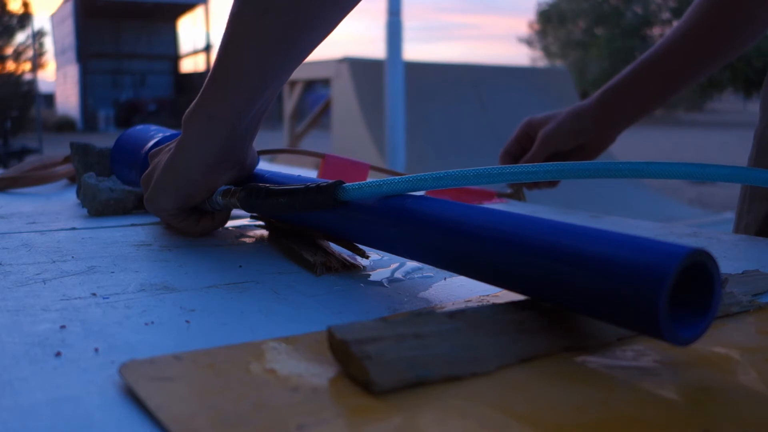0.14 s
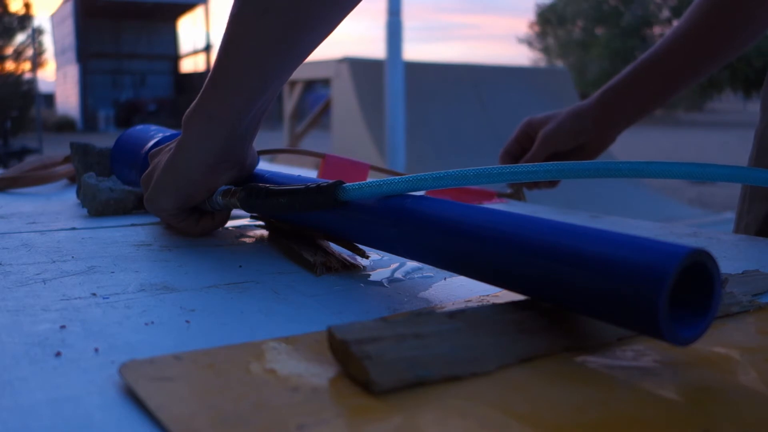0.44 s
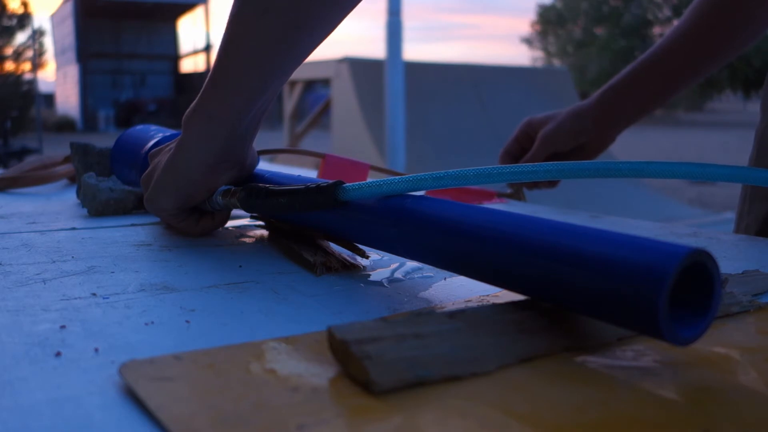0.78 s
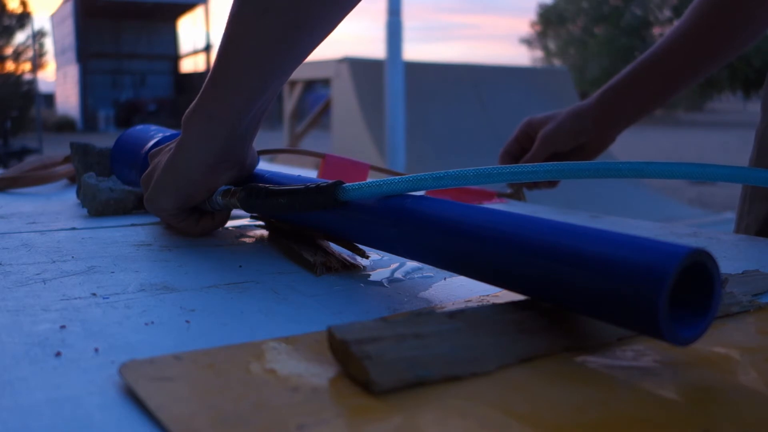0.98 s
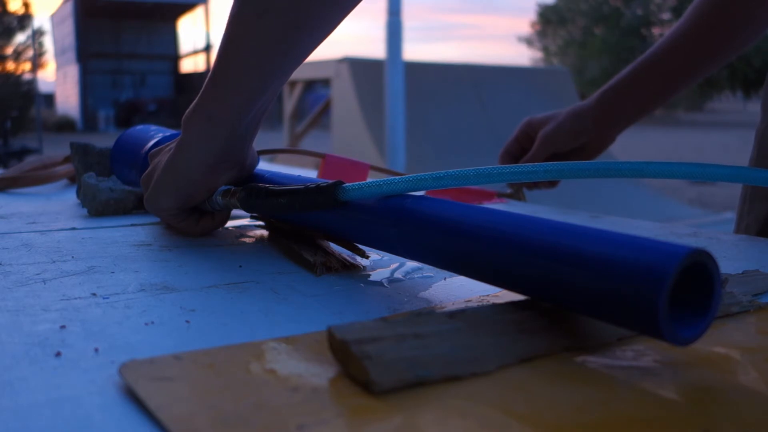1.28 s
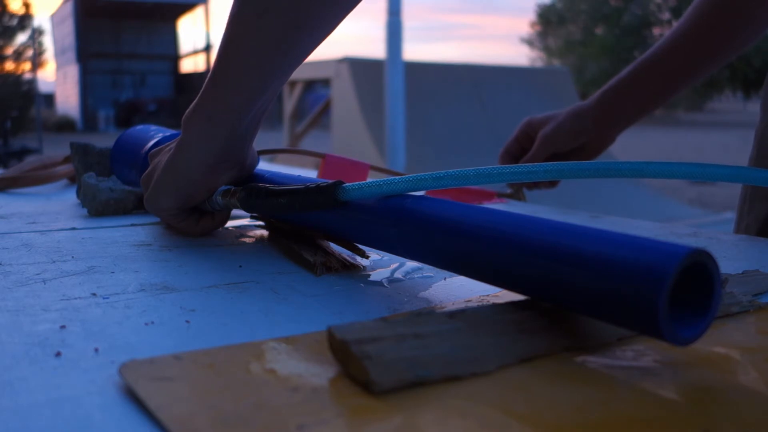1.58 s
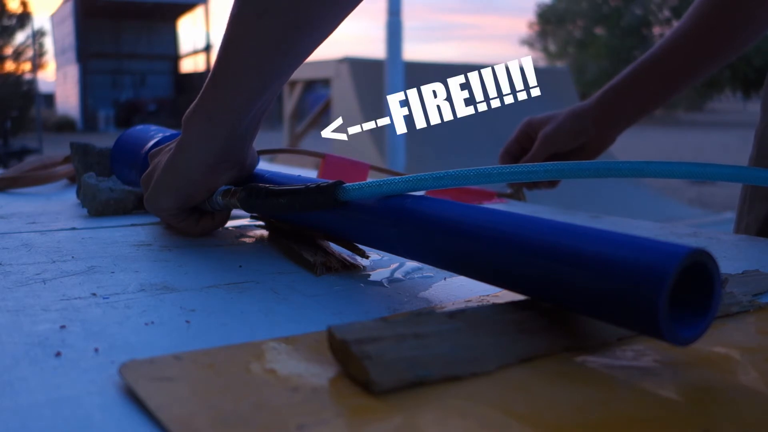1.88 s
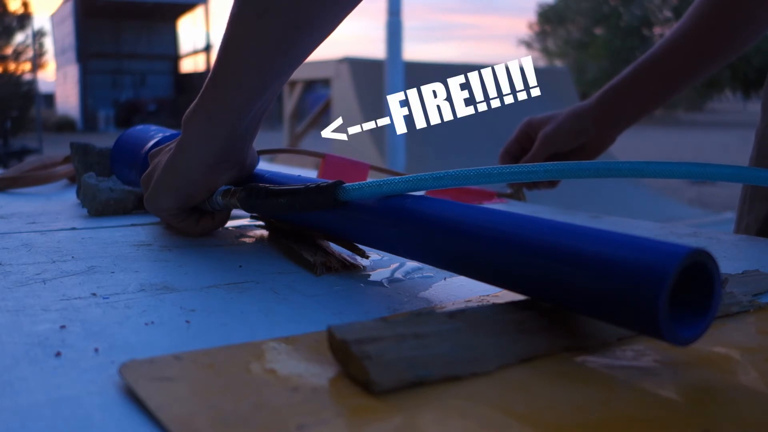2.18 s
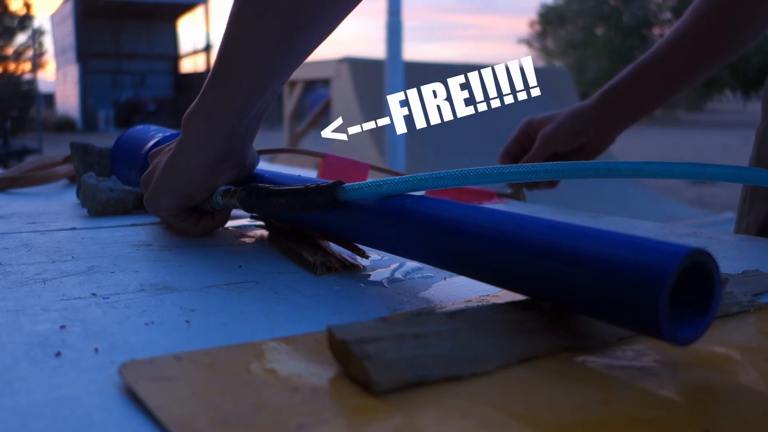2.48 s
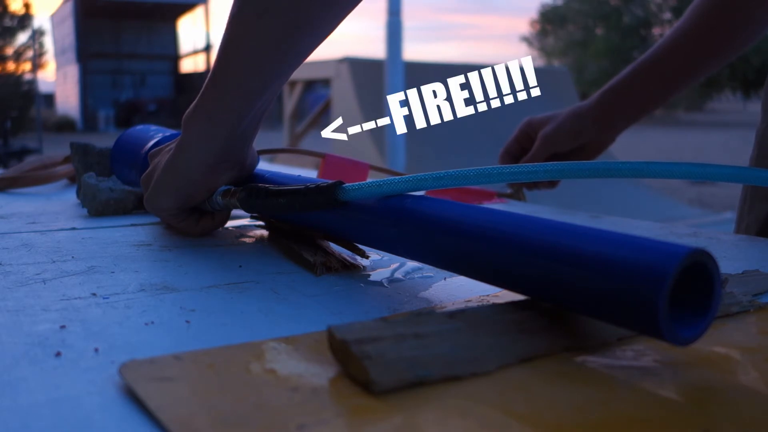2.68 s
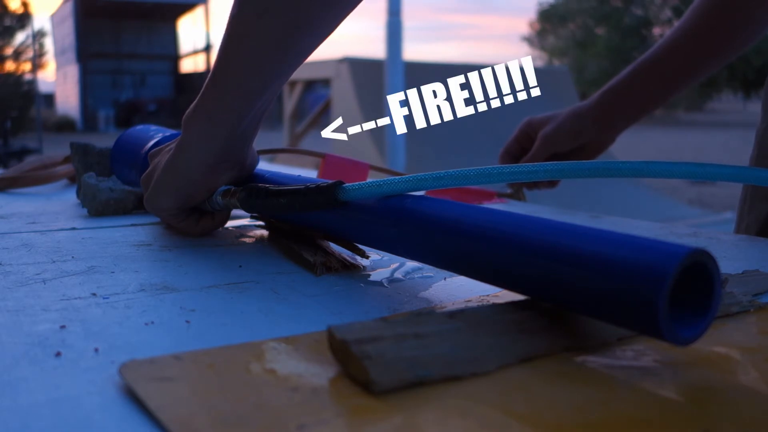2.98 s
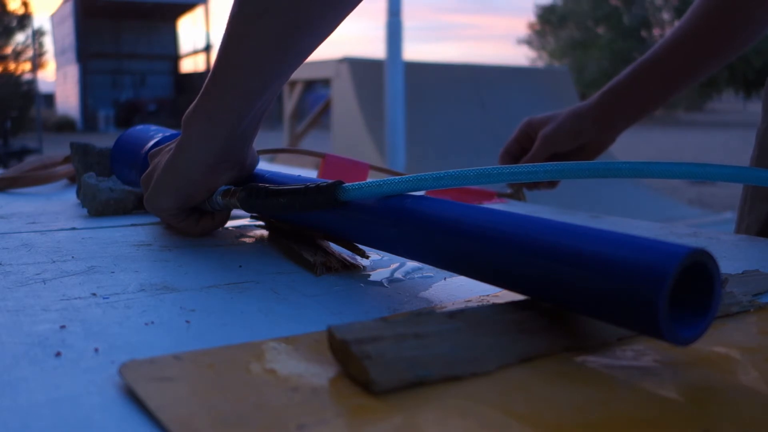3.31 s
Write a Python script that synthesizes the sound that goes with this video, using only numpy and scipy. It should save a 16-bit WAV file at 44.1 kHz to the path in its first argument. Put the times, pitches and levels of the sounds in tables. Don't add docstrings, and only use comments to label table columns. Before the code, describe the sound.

A small tube jet burning gas drones loudly from 0 to about 3.45 seconds without a break. Its rough, hollow notes flutter over a low roar, creeping slightly higher in pitch. Rushing air hisses with flickering high whistles. Faint dull ticks come near 0.5, 0.8-0.9, 1.9, 2.2 and 3.3-3.4 seconds. Close outdoor stereo camera sound, thin bass, compressed peaks, short bright wall reflections.

```python
import sys
import numpy as np
from scipy import signal
from scipy.fft import rfft, irfft, next_fast_len
from scipy.io import wavfile
from scipy.ndimage import uniform_filter1d, map_coordinates

SR = 44100
rng = np.random.default_rng(int(sys.argv[2]) if len(sys.argv) > 2 else 0)


def to_wav(sig):
    pcm = np.clip(np.atleast_2d(sig), -1, 1) * 32767
    pcm = np.round(pcm).astype(np.int16)
    wavfile.write(sys.argv[1], SR, pcm.T)


def elevation(decibels):
    levels = np.asarray(decibels, float)
    return 10 ** (levels / 20)


N = 152145
LEFT_RIGHT = np.array([[.5], [-.5]])


def unit(x):
    return x / np.sqrt(np.mean(np.abs(x) ** 2, -1, keepdims=True) + 1e-20)


def along(points, hz):
    point_hz, value = np.transpose(points)
    return np.interp(np.log(hz + 1), np.log(point_hz + 1), value)


def curves(rows):
    start_s, *columns = np.transpose(rows)
    return [np.interp(np.arange(N) / SR, start_s, column) for column in columns]


def wobble(rate):
    return map_coordinates(rng.standard_normal(1000), [np.arange(N) * rate / SR])


def filtered(x, response):
    size = next_fast_len(N + SR // 4)
    return irfft(rfft(x, size) * response(np.fft.rfftfreq(size, 1 / SR)), size)[..., :N]


def noise(spectrum):
    return unit(filtered(rng.standard_normal((2, N)), lambda hz: elevation(along(spectrum, hz))))


def note(pitch_hz, width_hz, steady):
    keep = np.exp(-np.pi * width_hz / SR)
    poles = np.convolve([1, -keep], [1, -keep ** 11.8])
    shaking = rng.standard_normal((2, N, 2)) @ [1, 1j]
    swing = unit(signal.lfilter([1], poles, shaking, axis=1))
    swing = swing * (np.abs(swing) + 0.069) ** -np.clip(steady, 0, 1)
    phase = 2 * np.pi * np.cumsum(pitch_hz * np.ones(N)) / SR
    return unit((swing * np.exp(1j * phase)).real)


# start_s [s], second_note_hz [Hz], level_db [dB], lowest_note_db [dB against the others]
FLAME_COURSE = [(0.0, 520.5, -14.5, -4.8), (0.2, 535.3, -19, 5), (0.41, 534.7, -16.5, -2.8),
                (0.61, 523.3, -18, 2.8), (0.81, 530.7, -15.5, -3), (1.01, 531.6, -16, -5),
                (1.22, 537.8, -15, -2), (1.42, 541, -18, 0.5), (1.62, 541, -16, -1),
                (1.83, 542.1, -17.5, -1.5), (2.03, 539.3, -18, 0.8), (2.23, 541, -16.6, -1),
                (2.44, 540.4, -16.5, 0), (2.64, 553.7, -17.5, 2), (2.84, 554.8, -15.5, -2),
                (3.04, 548.9, -15.6, -3.5), (3.25, 554.7, -16, -1), (3.45, 559.5, -16.5, -1.5)]
# pitch_hz [Hz], width_hz [Hz], level_db [dB], heat_follow [share of the heat's climb]
TUBE_NOTES = [
    (198.3, 24.1, -3, 0.13),
    (541, 31.5, 0, .95),
    (1011.4, 60, -11.5, 1.2),
    (1475, 98, -19, .8),
]
NOTE_STEADINESS = [.12, .23, 0, 0]
# start_s [s], level_db [dB]
THIRD_NOTE_SWELL = [(0, 0), (.1, -5.5), (.22, 6), (.35, -2.5), (.58, 5), (.87, -6.5), (1.05, -1), (1.75, 0),
                    (2.25, 2), (3, -1), (3.3, 1), (3.45, 4)]
# pitch_hz [Hz], level_db [dB]
ROAR_COLOUR = [(20, -26), (60, -16), (150, -4.5), (240, -3), (330, -16), (450, -4), (800, -15.5),
               (1300, -23), (2000, -40)]


def flame():
    second_hz, level_db, lowest_db = curves(FLAME_COURSE)
    heat = second_hz / second_hz.mean()
    notes = []
    for (hz, width_hz, db, follow), steady in zip(TUBE_NOTES, NOTE_STEADINESS):
        flutter = 1 + .012 * wobble(13)
        level = elevation(db + 0.3 * wobble(6.17))
        notes.append(level * note(hz * heat ** follow * flutter, width_hz, steady))
    notes[0] = notes[0] * elevation(lowest_db - lowest_db.mean())
    notes[2] = notes[2] * elevation(curves(THIRD_NOTE_SWELL)[0] + 1.3 * wobble(13))
    roar = elevation(-15.5 + 1.1 * wobble(60)) * noise(ROAR_COLOUR)
    return elevation(level_db) * (unit(sum(notes)) + roar)


# pitch_hz [Hz], width_hz [Hz], level_db [dB], jet_follow [share of the jet's swings]
NOZZLE_WHISTLES = [(2356, 110, -5, 0.37), (2615, 100, -14.5, 0.31), (4325, 410, -10, 0.47),
                   (4794, 220, -7, 0.24), (5230, 500, -14, 1), (6670, 750, -20, 0.51),
                   (7256, 154, -18.5, 0.42), (7760, 100, -32.5, 1), (8560, 220, -24.5, .9),
                   (9110, 160, -18.5, 0.45), (9650, 260, -23, .9), (10970, 890, -15.5, 0.51)]
# pitch_hz [Hz], level_db [dB]
HISS_COLOUR = [(900, -21), (2000, 5.5), (3300, 3), (5000, -12.5), (5600, -21.5), (8000, -16.5), (8600, -6),
               (11000, -12)]
# [dB, left over right]
JET_COURSE = [(0.0, -29, -7.5), (0.23, -32.5, 1), (0.33, -22.5, -9), (0.34, -31, -8), (0.42, -26.5, -3),
              (0.55, -31, -6), (1.07, -27.5, -0.5), (1.35, -32.5, 1), (1.42, -23.5, 1), (1.62, -34.5, 5),
              (1.7, -30.5, 5), (2.01, -30.5, 4), (2.08, -26.5, -3), (2.17, -32, 7), (2.21, -29.5, 0),
              (2.39, -32.5, 2.5), (3.44, -30.5, 4), (3.45, -39, 0)]


def jet():
    edge_db = curves(JET_COURSE)[0]
    slow_db, fast_db = -0.07 * wobble(9), 2.05 * wobble(40)
    gust_db = edge_db - edge_db.mean() + slow_db + fast_db
    whistles = 0
    for hz, width_hz, db, follow in NOZZLE_WHISTLES:
        flicker_db = 1.37 * (wobble(22.02) + 1.04 * wobble(60))
        pitch_hz = hz * (1 + 0.0073 * wobble(25))
        whistles = whistles + elevation(db + follow * gust_db + flicker_db) * note(pitch_hz, width_hz, 0.05)
    hiss = elevation(-7 + 0.4 * gust_db + 1.27 * wobble(18)) * noise(HISS_COLOUR)
    return elevation(edge_db.mean() + 11) * unit(whistles + hiss)


def shade(air):
    upper = filtered(air, lambda hz: np.exp(-((hz - 4800) / 700) ** 2))
    left_right_db = curves(JET_COURSE)[1]
    return air + upper * (elevation(LEFT_RIGHT * left_right_db) - 1)


# start_s [s], peak_db [dB]
SPARK_TIMES = [
    (.517, -29),
    (.82, -24),
    (.916, -22),
    (1.881, -23),
    (2.184, -23),
    (3.327, -22),
    (3.394, -22),
]


def sparks():
    centre_hz, wide_hz, fade_s = 1350, 1300, .03
    out = np.zeros((2, N + SR))
    t = np.arange(SR // 20) / SR
    band = signal.butter(2, [centre_hz - wide_hz / 2, centre_hz + wide_hz / 2], "band", fs=SR)
    puffs = unit(signal.lfilter(*band, rng.standard_normal((len(SPARK_TIMES), 2, len(t)))))
    for (start_s, peak_db), puff in zip(SPARK_TIMES, puffs):
        start = round(start_s * SR)
        swell = elevation(peak_db - 4 - 60 * t / fade_s) * (1 - np.exp(-t / .001))
        out[:, start:start + len(t)] += swell * puff
    return out[:, :N]


# pitch_hz [Hz], likeness [0 to 1]
MIC_LIKENESS = [(60, .8), (180, 1), (320, 0.89), (550, 0.99), (1300, .65), (2400, 0.94), (4500, 0.75),
                (8000, 0.37)]
# pitch_hz [Hz], left_over_right_db [dB]
MIC_LEAN = [(60, 0.5), (500, -2.5), (1500, 0.4), (3000, -0.5), (6500, 1.2), (7800, 1.5), (9000, 9.5),
            (9500, 3.5)]
# pitch_hz [Hz], lead_rad [radians]
MIC_LEAD = [(2000, -0.1), (2800, -1), (4300, 1), (5200, -1.8), (7500, -0.016), (8800, 0.97), (10000, -0.64)]


def ports(pair):
    def mix(hz):
        angle = np.arccos(np.clip(along(MIC_LIKENESS, hz), -1, 1)) / 2
        return np.array([np.cos(angle), np.sin(angle)])

    def tilt(hz):
        return elevation(LEFT_RIGHT * along(MIC_LEAN, hz)) * np.exp(1j * LEFT_RIGHT * along(MIC_LEAD, hz))

    shared, unshared = filtered(pair, mix)
    return filtered(np.array([shared + unshared, shared - unshared]), tilt)


# delay_ms [ms], level_db [dB]
WALL_ECHOES = [(4.1, -17), (8.8, -33), (9.5, -17), (10.7, -15), (12.2, -31), (14.2, -34)]


def walls(x):
    skew_ms = 0.464 * np.array([[0], [1]])

    def response(hz):
        late = 0
        for delay_ms, db in WALL_ECHOES:
            late = late + elevation(db) * np.exp(-2j * np.pi * hz * (delay_ms + skew_ms) / 1000)
        return 1 + late * hz ** 4 / (hz ** 4 + 5900 ** 4)

    return filtered(x, response)


def scene():
    air = shade(ports(jet()))
    return walls(air + ports(flame() + sparks()))


def band_limit(x):
    return signal.sosfilt(signal.butter(12, 11610, fs=SR, output="sos"), x)


def record(dry):
    def microphone(hz):
        bass_cut = np.maximum(1 / np.sqrt(1 + (139 / (hz + 1)) ** 8), elevation(-12))
        housing_dip = elevation(-3.5 * np.exp(-((hz - 5680) / 230) ** 2))
        return bass_cut * housing_dip

    def top_cut(hz):
        return 1 / (1 + np.exp(np.clip((hz - 11032) / 13, -50, 50)))

    ceiling_db, squeeze, follow_s = -4.5, 0.083, 0.0112
    dry = filtered(dry, microphone)
    power = np.abs(uniform_filter1d(np.mean(dry ** 2, 0), round(follow_s * SR)))
    loud = power / elevation(2 * ceiling_db)
    squeezed = dry * (loud + 0.0087) ** (-squeeze / 2)
    return band_limit(filtered(squeezed, top_cut))


dry = scene()
out = record(dry)
to_wav(out)
```